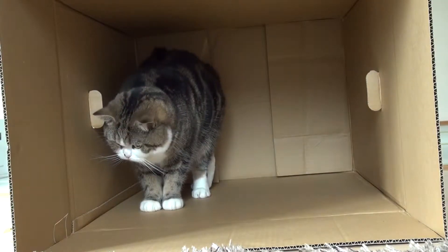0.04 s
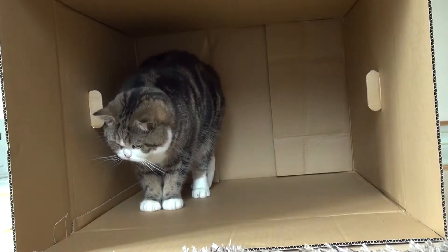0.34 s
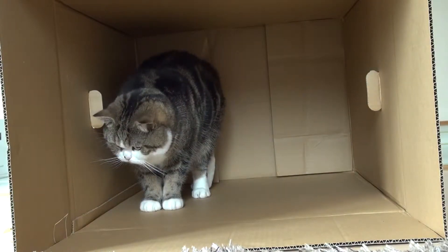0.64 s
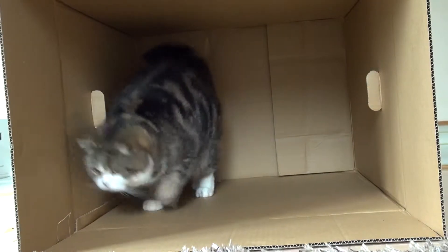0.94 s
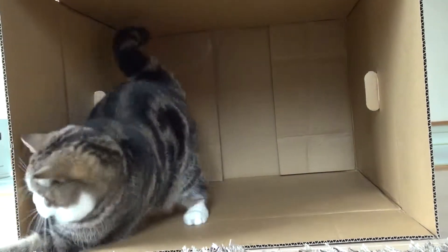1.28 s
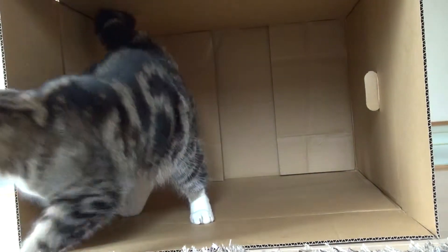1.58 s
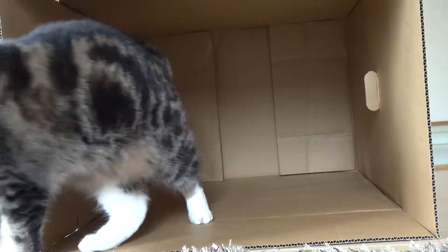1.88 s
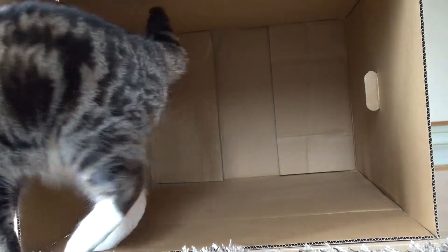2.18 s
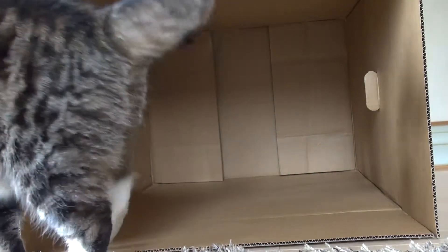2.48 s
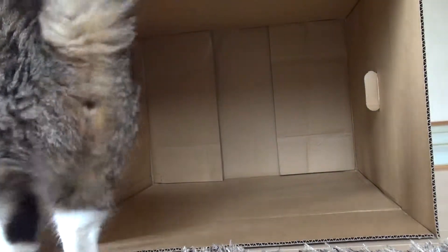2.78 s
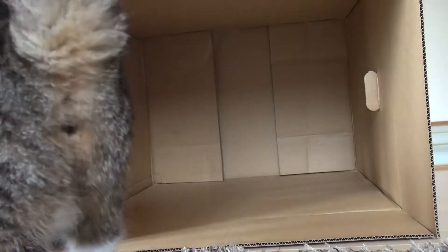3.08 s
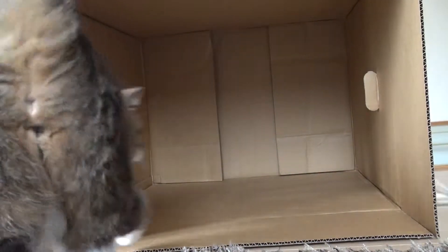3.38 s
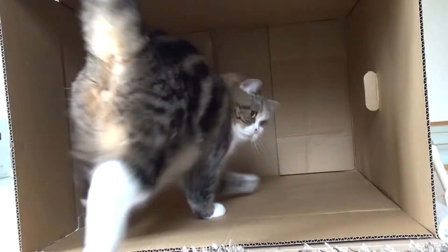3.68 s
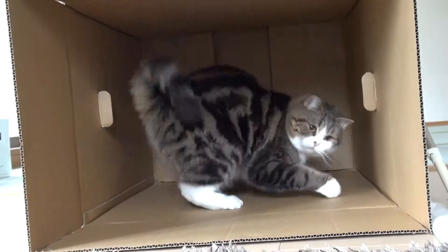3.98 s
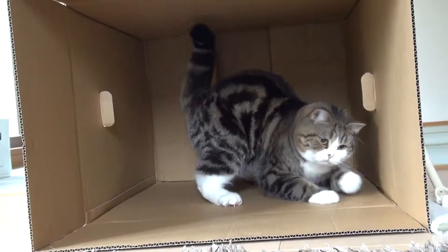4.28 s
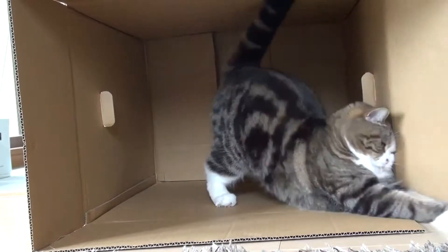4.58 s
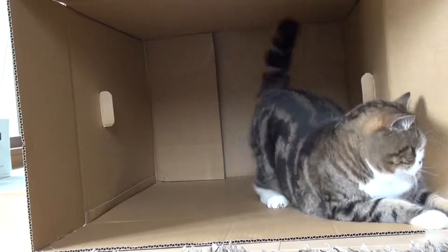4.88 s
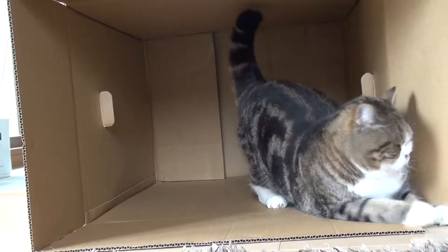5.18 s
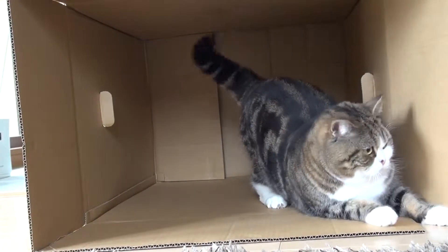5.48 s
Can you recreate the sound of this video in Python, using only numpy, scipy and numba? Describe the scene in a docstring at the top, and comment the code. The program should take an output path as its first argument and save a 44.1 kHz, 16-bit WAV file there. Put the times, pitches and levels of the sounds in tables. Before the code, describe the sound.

Paws thump and scuff inside a hollow cardboard box as a cat moves about, fur hissing softly and the board crackling.

```python
"""A cat turns round in a large cardboard box lying on its side, close to the microphone in a quiet room.
Out of the hush, paws thump the panels at 1.2 s and set the hollow box booming. Light steps follow, fur
and pads sliding over the board with a grainy hiss, until another heavy step lands at 3.2 s. From 3.8 s
claws and flexing board give a flurry of dry snaps, with more thumps at 4.5 and 4.8 s. A claw drags in
two short scratches, and a last soft step dies away."""
import sys
import numpy as np
from scipy import signal
from scipy.fft import rfft, irfft
from scipy.io import wavfile
from numba import njit

SR = 44100
rng = np.random.default_rng(int(sys.argv[2]) if len(sys.argv) > 2 else 0)


def wav_record(signal):
    """Record a signal, one row per channel, as 16-bit PCM in the file named by sys.argv[1]."""
    frames = np.transpose(np.atleast_2d(signal))
    bounded = np.clip(frames, -1, 1)
    # unit amplitude maps onto the largest positive 16-bit level
    quanta = np.round(bounded * 32767).astype(np.int16)
    wavfile.write(sys.argv[1], SR, quanta)


N = 253134
TIME = np.arange(N) / SR
AGE = np.arange(SR) / SR   # seconds since a contact


def from_db(db):
    return 10 ** (np.asarray(db) / 20)


def rms_one(x):
    return x / np.sqrt(np.mean(x ** 2) + 1e-20)


def dying(t60):
    return from_db(-60 * AGE / t60)


def in_time(curve):
    """A breakpoint curve at every sample."""
    return np.interp(TIME, *np.transpose(curve))


def add(out, t, sound):
    """Mix a sound in at t seconds."""
    i = round(t * SR)
    out[:, i:i + sound.shape[-1]] += sound[..., :N - i]


def cut(x, hz, kind, order=2):
    return signal.sosfilt(signal.butter(order, min(hz, .45 * SR), kind, fs=SR, output="sos"), x)


def resonate(x, hz, width):
    """One resonance; width is a share of its pitch."""
    hz = min(hz, .3 * SR)
    return signal.lfilter(*signal.iirpeak(hz, max(1 / width, 4 * hz / SR), fs=SR), x)


@njit
def glide(x, hz, width):
    """A state-variable band-pass whose pitch moves; width is a share of its pitch."""
    tuning = np.tan(np.pi * np.minimum(np.maximum(hz, 50.), .4 * SR) / SR)
    out = np.zeros_like(x)
    for c in range(len(x)):
        a = b = 0.
        for i, g in enumerate(tuning):
            band = (a + g * (x[c, i] - b)) / (1 + g * (g + width))
            a, b = 2 * band - a, b + 2 * g * band
            out[c, i] = band * width
    return out


def coloured(x, spectrum):
    """Give noise a spectrum; rms 1."""
    hz, db = np.transpose(spectrum)
    bins = np.fft.rfftfreq(N, 1 / SR) + 1e-3
    gain = from_db(np.interp(np.log(bins), np.log(hz), db, left=-80))
    return rms_one(irfft(rfft(x) * gain, N))


def widen(pair, side_db=-6.5, bass_hz=650, top_hz=10800):
    """Two noises as a diffuse field: long waves reach both microphone ports alike."""
    side = cut(cut(pair[1], bass_hz, "high", order=1), top_hz, "low", order=8)
    return pair[0] + from_db(side_db) * side * np.array([[1], [-1]])


def scatter(db, t60, swell_s):
    """A dense train of reflections that swells and dies; db sets its energy."""
    swell = 1 - np.exp(-AGE / (swell_s + 1e-4))
    echoes = widen(rng.standard_normal((2, len(AGE)))) * dying(t60) * swell
    return from_db(db) * rms_one(echoes) / np.sqrt(len(AGE))


def through(sound, response):
    return signal.fftconvolve(np.atleast_2d(sound), response, axes=-1)[:, :len(AGE)]


def room_air():
    """The hush of the room, creeping up a few dB."""
    # room tone: f/Hz, density/dB
    spectrum = [(15, -69), (25, -18), (69, -25.5), (91, -8), (129, -14), (164, -8.5), (322, -10),
                (359, -4.5), (469, -8), (1020, -4.5), (1110, -6.5), (1660, -7.5), (10900, -23),
                (14300, -30), (15500, -36)]
    # its fader: t/s, level/dB
    level = [(0, -62), (0.9, -64.5), (5.74, -59.5)]
    return from_db(in_time(level)) * coloured(widen(rng.standard_normal((2, N)), side_db=-6), spectrum)


def walls(x):
    """Each wall of the box sends the sound back a moment later."""
    # early reflections: delay/s, level/dB
    echoes = [(.0018, -33.5), (.0035, -57), (.0061, -23), (0.0143, -15.5)]
    out = x.copy()
    for delay, db in echoes:
        add(out, delay, from_db(db) * x)
    return out


def cavity(x, standing_db=-5):
    """Standing waves between the walls lend everything inside a boxy colour."""
    # standing waves: f/Hz, width/Hz, relative level/dB
    waves = [(704, 67, 1), (1375, 400, -1.5), (1930, 210, -14), (2390, 28, -6), (3800, 160, -35),
             (6000, 170, -8), (6600, 160, -5)]
    return x + sum(from_db(standing_db + db) * resonate(x, hz, width / hz) for hz, width, db in waves)


def lean(x, mids_hz=(320, 5500)):
    """The cat's place tips the mids to the left."""
    # pan: t/s, left minus right/dB
    pan = [(0.9, 2), (1.2, 2.5), (1.7, 4), (2.5, 1.5), (3.5, 1.5), (4.1, 2), (4.7, 2), (5.4, 0.5)]
    mids = signal.sosfiltfilt(signal.butter(1, mids_hz, "band", fs=SR, output="sos"), x)
    return x + mids * (from_db(in_time(pan) * np.array([[.5], [-.5]])) - 1)


def friction(grain_db, size=N):
    """Countless tiny slips of uneven size."""
    sizes = from_db(grain_db * np.minimum(rng.exponential(1, size), 5))
    return widen(rng.standard_normal((2, size)) * sizes)


def pressure_wander(per_s=140, depth_db=1):
    """The gain wavers as the contact pressure wanders."""
    knots = rng.standard_normal(1024)
    return from_db(depth_db * np.interp(TIME * per_s, np.arange(len(knots)), knots))


def rub_levels(swell_s=0.078, swell_db=9, fade_db_per_s=101):
    """Each rub swells, holds and fades; gives the dB of hiss, rustle and fizz over time."""
    # fur pressed on the board: from/s, until/s, hiss/dB, rustle/dB re hiss, fizz/dB re hiss
    rubs = [(1.121, 1.145, -47, -4, -6), (1.225, 1.23, -51.5, 6, -6), (1.356, 1.406, -56, -5.5, -3),
            (1.702, 1.94, -57.5, -6, -4.5), (2.008, 2.092, -61.5, 1, -5.5), (2.216, 2.285, -55, -4, -8),
            (2.44, 2.545, -58.5, -3, -7), (2.64, 2.805, -57.5, -4, -8.5), (2.896, 2.935, -60, -1.5, -6.5),
            (3.038, 3.414, -62, .5, -4.5), (3.644, 3.71, -61, -4, -3), (3.81, 3.853, -59.5, -6, -3.5),
            (3.997, 4.017, -41.5, -4, -4), (4.225, 4.27, -43.5, -4, -9.5), (4.556, 4.569, -50, -1.5, 3),
            (4.643, 4.782, -46, -5, -1.5), (5.382, 5.38, -57.5, -12, 0), (5.5, 5.67, -70, -19, 1.5)]
    power = np.full((3, N), 1e-14)
    for start, end, db, rustle_db, fizz_db in rubs:
        swell = swell_db * (np.maximum(start - TIME, 0) / swell_s) ** 1.3
        fade = fade_db_per_s * np.maximum(TIME - end, 0)
        power += np.outer(from_db([0, rustle_db, fizz_db]), from_db(db - swell - fade)) ** 2
    return 10 * np.log10(power)


def fur_rubs(hollow_db=-6):
    """Fur hisses on the liner; its pressure makes the board rustle and the box sound hollow."""
    # fur on cardboard: f/Hz, density/dB
    spectrum = [(88, -19), (150, -9), (530, -1.5), (618, -2), (695, -4.5), (812, 2.5), (1170, -0.5),
                (1320, -2.5), (1830, -2.5), (4750, -3.5), (9180, -9), (10900, -14.5), (12800, -18),
                (13800, -18), (15500, -72)]
    # edges of the hollow, rustle, hiss and fizz bands: f/Hz
    edges = [170, 600, 2500, 8000, 15000]
    hiss, rustle, fizz = rub_levels()
    rub = coloured(friction(grain_db=1.5), spectrum)
    out = np.zeros((2, N))
    for db, low, high in zip([rustle + hollow_db, rustle, hiss, fizz], edges, edges[1:]):
        band = cut(cut(rub, low, "high", order=4), high, "low", order=4)
        out += from_db(db) * rms_one(band)
    return out * pressure_wander()


def skids(middle_s=0.5):
    """A pad or the flank slips with a swish, whose pitch moves with the point of contact."""
    # swishes: middle t/s, level/dB, half length/s, f/Hz, width/share of f, rise/octaves per half length
    swishes = [(1.107, -48, 0.037, 2200, 2, -.07), (1.262, -47, .012, 2000, 3.4, -.037),
               (1.687, -54.5, .019, 3000, 1.1, -0.073), (1.811, -53.5, 0.038, 3060, 2.1, -0.017),
               (1.82, -62, 0.081, 3170, 0.018, 0.0087), (2.003, -55, 0.017, 1010, 0.54, -0.017),
               (2.47, -58, 0.013, 925, 0.12, 0.098), (2.638, -63.5, 0.035, 1120, .19, -0.096),
               (2.715, -63, 0.026, 1290, 0.96, .087), (2.804, -62, .04, 910, 0.24, -0.077),
               (2.989, -70, 0.064, 905, 0.1, 0.086), (3.191, -61.5, .08, 1690, .39, .077),
               (3.648, -58, 0.0086, 7450, 0.62, .072), (3.958, -42, 0.042, 9600, 1.6, -0.072),
               (4.059, -43.5, 0.028, 1900, 0.67, -0.29), (4.209, -44, 0.028, 8100, 2.1, 0.057),
               (4.495, -53, .0054, 3030, 4.4, 0), (4.53, -38, 0.011, 1420, .45, .27),
               (4.723, -35.5, .011, 3370, 0.92, -.058)]
    out = np.zeros((2, N))
    for t, db, half, pitch, width, rise in swishes:
        along = (AGE - middle_s) / half
        hz = pitch * 2 ** (rise * np.clip(along, -2, 2))
        grit = friction(grain_db=-0.5, size=len(AGE))
        band = glide(glide(grit, hz, width), hz, 2 * width)
        swish = from_db(db) * rms_one(band / np.sqrt(hz)) * np.exp(-.5 * along ** 2)
        room = scatter(db=-3, t60=0.38, swell_s=0.0031)
        add(out, t - middle_s, swish + through(swish, room))
    return out


def stick_slip(length, count=40, per_s=810, slip_s=0.0015, spread_db=2, bite_s=0.0012, release_s=0.0063):
    """A claw digs in, judders along in short uneven slips and comes free; gives its force over time."""
    times = np.cumsum(rng.uniform(0.55, 1.3, count)) / per_s
    slips = np.zeros(len(AGE))
    slips[(times * SR).astype(int)] = from_db(rng.normal(0, spread_db, count))
    judder = signal.lfilter([1], [1, -np.exp(-1 / (slip_s * SR))], slips)
    force = judder * (1 - np.exp(-AGE / bite_s)) * np.exp(-np.maximum(AGE - length, 0) / release_s)
    return force / np.sqrt(np.sum(force ** 2) / (length * SR))


def scratches(overtone=1.41, overtone_db=-6, tip_hz=12000, tip_width=0.37):
    """Each slip of a claw rasps in the liner's two resonances and squeaks at the tip."""
    # claw drags: t/s, length/s, level/dB, f/Hz, width/share of f, tip squeak/dB re level
    drags = [(1.327, .022, -57, 7000, 1.2, -8), (4.885, 0.028, -38, 4360, 0.41, -5.5),
             (4.948, .023, -45, 7100, 0.83, -6.5), (5.342, 0.011, -47.5, 4600, 0.63, -14)]
    out = np.zeros((2, N))
    for t, length, db, pitch, width, tip_db in drags:
        grit = friction(grain_db=-2, size=len(AGE))
        peaks = [(pitch, width, 0), (pitch * overtone, width / overtone, overtone_db),
                 (tip_hz, tip_width, tip_db)]
        tone = sum(from_db(peak_db) * rms_one(resonate(resonate(grit, hz, w), hz, 2 * w))
                   for hz, w, peak_db in peaks)
        rasp = from_db(db) * tone * stick_slip(length)
        room = scatter(db=-5.5, t60=0.38, swell_s=0.0024)
        add(out, t, rasp + through(rasp, room))
    return out


def crack(pitch, width):
    """One sharp pulse of height 1."""
    pulse = resonate(signal.unit_impulse(len(AGE) // 16), pitch, width)
    pulse = cut(cut(pulse, 2.4 * pitch, "low", order=4), 0.13 * pitch, "high")
    return pulse / np.abs(pulse).max()


def crack_run(pitch, width, after_db, length, count=4, fade_db=5.5, spread_octaves=0.095):
    """The board gives way in a short run: the snap, then uneven, narrower cracks that weaken."""
    out = np.zeros((1, len(AGE) // 4))
    add(out, 0, crack(pitch, width))
    for k in range(count):
        along = (k + rng.uniform(.5, 1)) / count
        hz = pitch * 2 ** (spread_octaves * rng.normal())
        height = rng.choice([-1, 1]) * from_db(after_db - fade_db * along)
        add(out, along * length, height * crack(hz, 0.92 * width))
    return out


def snaps(panel_db=-8, panel_width_hz=18):
    """Claws and buckling board crack; the panel rattles and rings, the box and the room reflect it."""
    # snaps: t/s, peak/dB, f/Hz, width/share of f, after-cracks/dB re peak, length of their run/s
    runs = [(1.188, -21, 1840, 7.4, -12, 0.0084), (1.2167, -24, 4300, 0.71, -13, 0.022),
            (1.264, -36, 1100, 0.66, -9, .0079), (3.2505, -40.5, 4230, 1.4, -2, .015),
            (3.346, -41, 3700, 2.9, -3.5, 0.0088), (3.847, -38, 3520, 3.8, 0.5, .0074),
            (3.8915, -36.5, 1200, 3.1, -5.5, 0.00488), (3.918, -31, 5000, 1.5, 0, .005),
            (3.9375, -23, 5250, .98, -1, 0.0056), (4.007, -26.5, 2550, 1.5, 2, 0.014),
            (4.0092, -22.5, 1200, 0.55, -1.5, 0.0031), (4.1601, -29, 4500, 1.5, 1.5, 0.0064),
            (4.415, -41, 1800, 3.5, -19, .006), (4.4338, -37, 1070, 7.8, -7, 0.0085),
            (4.5003, -16.5, 1630, 0.99, -18, 0.0047), (4.5014, -26, 2360, 0.37, -2.5, 0.0055),
            (4.5164, -24, 910, 0.57, -14, 0.01), (4.631, -10, 4600, 1, -27, .004),
            (4.6327, -20, 2900, 0.36, -4, 0.0041), (4.645, -19.5, 5400, 0.42, -0.5, .004),
            (4.7918, -19.5, 1690, 2.6, -3, 0.00215), (4.7942, -19, 2190, 0.45, -2, 0.0037)]
    # stiff upper modes of the board: f/Hz
    panel_modes = [1016, 1160, 1260, 1315, 1379, 1676, 1992, 2400, 2507, 2986, 3382]
    out = np.zeros((2, N))
    for t, db, *run in runs:
        rattle = scatter(db=-4.5, t60=0.03, swell_s=0.0016)
        box = scatter(db=-7, t60=0.53, swell_s=0.0031)
        room = scatter(db=-6.5, t60=0.53, swell_s=0.013)
        response = rattle + box + room
        response[:, 0] += 1   # the direct sound
        add(out, t, -from_db(db) * through(crack_run(*run), response))
    return out + from_db(panel_db) * sum(resonate(out, hz, panel_width_hz / hz) for hz in panel_modes)


def footfalls(lag_s=0.0112, pitch_share=0.396, weight_scuff_db=-20, weight_flutter_db=-6):
    """Every step loads the board twice: the pad lands, then the weight settles with a deeper thud."""
    # steps: t/s, level/dB, f of the struck spot/Hz, spread/octaves, scuff/dB re level,
    # weight/dB re level, flutter/dB re level, time the pad takes to flatten/s, ring/share of a free panel's
    steps = [(0.976, -70, 190.6, 0.13, -12, -21, -2, 0.0055, 1.1),
             (1.176, -28, 617, 0.2, -12, -34, -7, 0.0046, 0.76),
             (1.182, -27, 298, 0.26, -20, -29, -13, 0.0025, 0.62),
             (1.191, -31, 423, 0.48, -22, -24, -9, 0.0025, 0.53),
             (1.221, -28.5, 260, 0.29, -26, -38, -9, 0.0038, .55),
             (1.318, -46.5, 178, 0.34, -32, -28, -11.5, .004, 0.95),
             (1.535, -49, 735, 0.059, 2.5, -12, -9.5, 0.0077, 0.94),
             (1.964, -53.5, 190, 0.14, -12, -20, -9, .004, 1.25),
             (1.972, -56.5, 795, 0.88, .5, -10, -0.5, 0.0052, 0.71),
             (2.159, -57, 291, 0.35, -1, -23, -13, 0.0075, 1.14),
             (2.275, -64, 230, 1, -10, -19, -4, .005, 0.82),
             (2.456, -62, 550, 0.13, 0, -25, -9, 0.0046, 0.8),
             (3.2447, -25.5, 274, 0.17, -21.5, -20, -13, 0.0052, 0.78),
             (3.257, -36.5, 375, 0.096, -24, -13, -9.5, 0.0027, 1),
             (3.279, -43.5, 150, 0.25, -18, -30, -5, .004, 1.1),
             (3.317, -44.5, 302, 1.06, -29, -30, -21, 0.0036, 0.89),
             (3.344, -39.5, 238, 0.18, -23, -32, -11, 0.0034, .35),
             (3.69, -53.5, 420, 1.2, -5.5, -7, -9, .004, 0.57),
             (3.846, -53, 293, 1.6, -9, -19, -11, 0.0036, 0.67),
             (3.888, -46, 450, .57, -3.5, -3, -8.5, 0.0048, 1.3),
             (3.913, -49.5, 428, 1.55, -14, -13, -4, .004, 0.8),
             (4.137, -49, 198, 1.3, -0.5, -8, -10, 0.0027, 0.78),
             (4.275, -52, 312, 0.75, -4, -34, -5, 0.0059, 1.17),
             (4.5002, -35.5, 570, 0.87, -3.5, -10, -6.5, 0.0017, 0.82),
             (4.645, -47.5, 330, 0.96, -8, -26, -5, 0.0034, 0.83),
             (4.711, -47.5, 357, 1.2, -12, -22, -9, .004, 1.24),
             (4.7858, -28.5, 450, .45, -16.5, -17, -7, 0.003, 0.41),
             (4.7981, -29.5, 330, 0.26, -12.5, -13.5, -6, 0.0026, .42),
             (4.815, -41.5, 135, 0.77, -21, -15, -10, 0.0044, 0.47),
             (5.014, -48, 252, 0.73, -4, -17.5, -4.5, 0.0056, .7),
             (5.342, -48.5, 580, 0.13, -5, -1, -8, 0.0038, 0.57),
             (5.352, -40, 247.5, 0.13, -28, -14, -10, 0.0028, 0.78),
             (5.379, -52.5, 235, 0.34, -27, -13, 0, .004, 0.89)]
    for t, db, pitch, spread, scuff_db, weight_db, flutter_db, flatten_s, freedom in steps:
        yield t, db, pitch, spread, scuff_db, flutter_db, flatten_s, freedom
        yield (t + lag_s, db + weight_db, pitch * pitch_share, spread,
               weight_scuff_db, weight_flutter_db, flatten_s, freedom)


def box_boom(pitch, spread, ring, far_modes_db=-15.5, detune=0.012):
    """Modes near the pitch of the struck spot ring most; the cat's weight detunes them at each step."""
    # modes of the panels and the air in the box: f/Hz, level/dB, t60/s
    modes = [(93.7, -4, 0.54), (139.8, -0.5, 0.57), (191.6, 0.5, 0.65), (239.4, -2.5, 0.57),
             (266.2, 3, 0.37), (294.3, 1, 0.28), (363.1, 2.5, 0.42), (380.5, 9, 0.18), (424.5, 5, 0.29),
             (484, 3.5, 0.16), (530.6, 11, 0.14), (586, 6.5, 0.2), (677, 2, 0.19), (751, -4.5, 0.52),
             (843, 14, 0.15), (1113, 5, 0.25)]
    hz, db, t60 = np.transpose(modes)[:, :, None]
    near = np.exp(-.5 * (np.log2(hz / pitch) / spread) ** 2)
    reach = near + from_db(far_modes_db) * np.minimum(pitch / hz, 1)
    strength = reach / np.linalg.norm(reach) * from_db(db + rng.normal(0, 1, hz.shape))
    cycles = hz * (1 + rng.normal(0, detune, hz.shape)) * AGE
    return (strength * np.sin(2 * np.pi * cycles) * dying(t60 * ring)).sum(0)


def paws(free_ring_db=-49, ring_halves_db=55, settle_s=0.3, scuff_hz=2400):
    """A pad loads the board: the box booms, the panel flutters, the pad scuffs."""
    out = np.zeros((2, N))
    room_tail = dying(t60=0.49)
    for t, db, pitch, spread, scuff_db, flutter_db, flatten_s, freedom in footfalls():
        press = 1 - np.exp(-(AGE / flatten_s) ** 2)
        ring = freedom * .5 ** ((db - free_ring_db) / ring_halves_db)   # heavier steps ring shorter
        choke = np.exp(-(AGE / (settle_s * freedom)) ** 2)   # the settling weight stops the ring
        boom = box_boom(pitch, spread, ring) * choke
        board, skin = (widen(rng.standard_normal((2, len(AGE)))) for _ in range(2))
        # a soft pad cannot shake the panel far above the pitch of the spot
        flutter = rms_one(cut(resonate(board, pitch, 1.04 * spread), pitch * 2 ** spread, "low", order=6))
        flutter *= from_db(flutter_db) * (dying(t60=0.16 * ring) + freedom * from_db(-0.5) * room_tail)
        scuff = rms_one(cut(resonate(skin, scuff_hz, width=5.9), 5000, "low", order=1))
        scuff *= from_db(scuff_db) * (dying(t60=0.087) + from_db(-1) * room_tail)
        add(out, t, from_db(db) * press * (boom + flutter + scuff))
    return out


def scene():
    """The cat's moves, coloured by the box, over the room tone."""
    cat = cavity(paws() + snaps() + scratches() + walls(fur_rubs() + skids()))
    cat = cut(cut(cat, 60, "high", order=4), 12500, "low", order=10)
    return lean(cat) + room_air()


def record(dry, dip_hz=9300, left_dip=0.57, right_dip=0.32, top_hz=14300):
    """The microphone ports dip in the high treble, the left one more; the top is cut."""
    heard = dry - np.array([[left_dip], [right_dip]]) * resonate(dry, dip_hz, width=0.26)
    return cut(heard, top_hz, "low", order=16)


dry = scene()
out = record(dry)
wav_record(out)
```